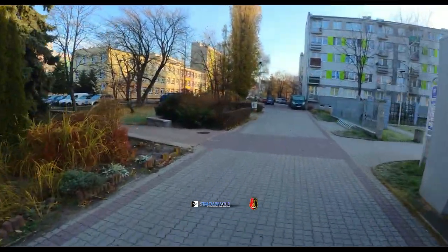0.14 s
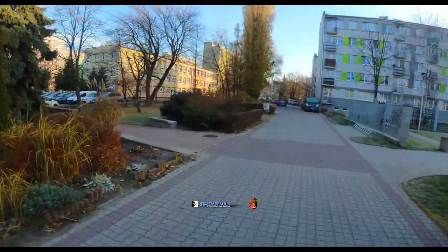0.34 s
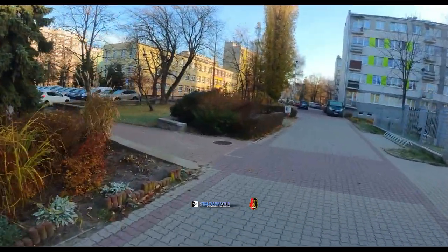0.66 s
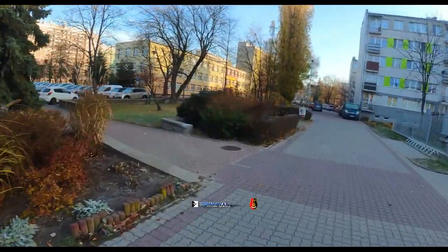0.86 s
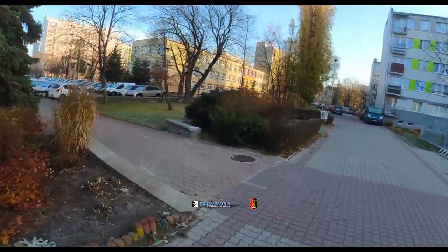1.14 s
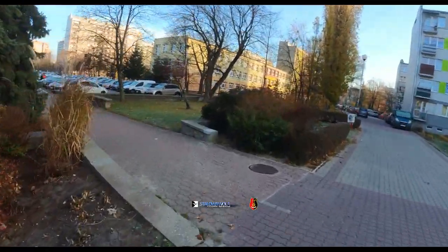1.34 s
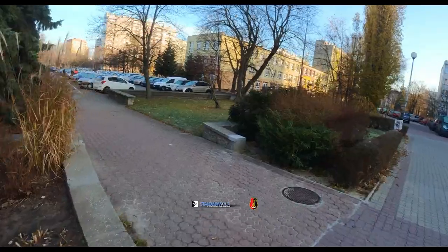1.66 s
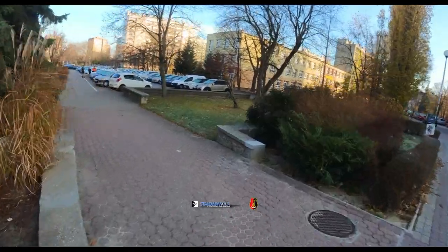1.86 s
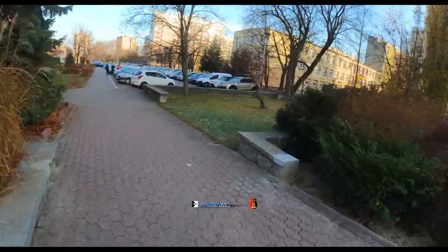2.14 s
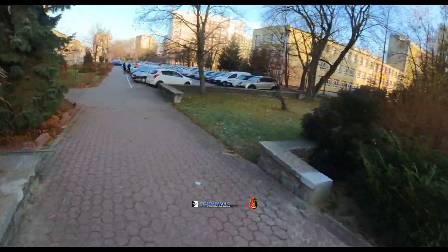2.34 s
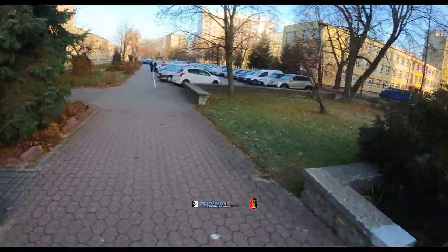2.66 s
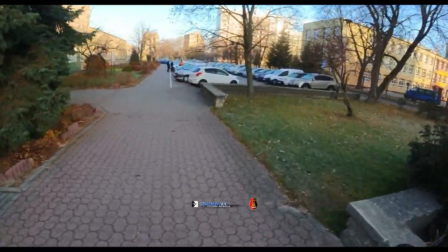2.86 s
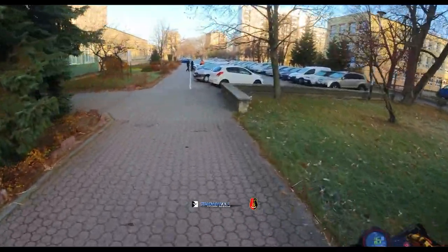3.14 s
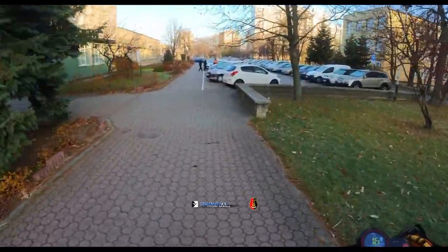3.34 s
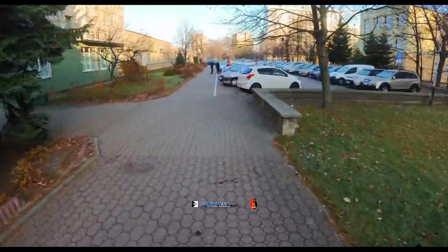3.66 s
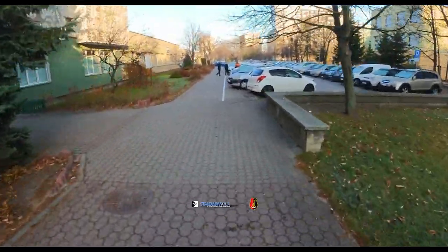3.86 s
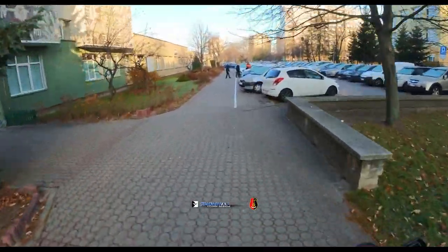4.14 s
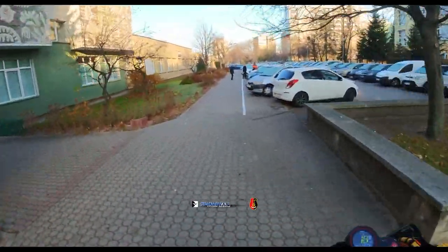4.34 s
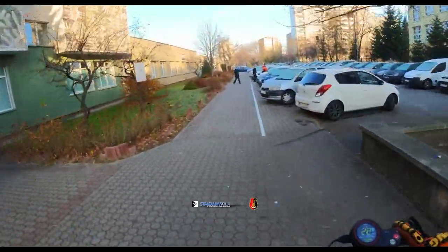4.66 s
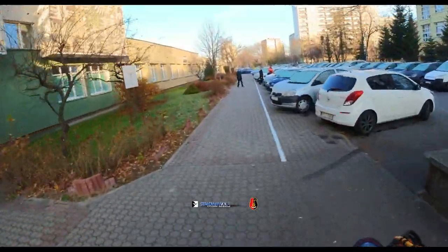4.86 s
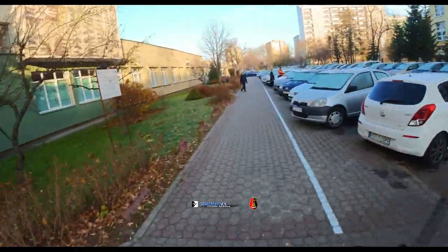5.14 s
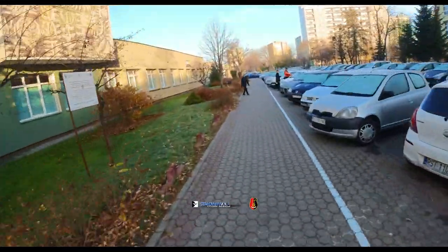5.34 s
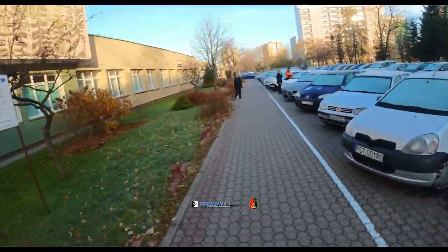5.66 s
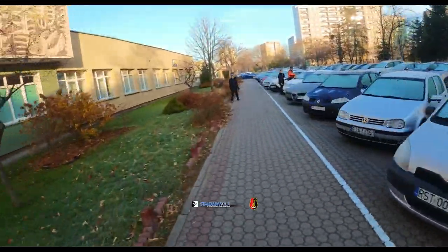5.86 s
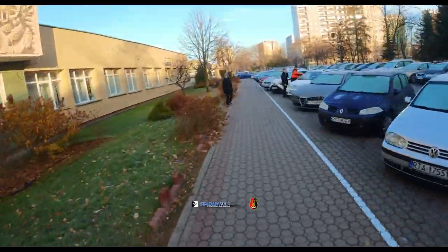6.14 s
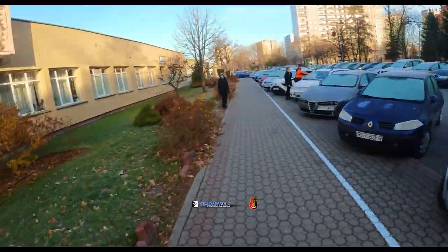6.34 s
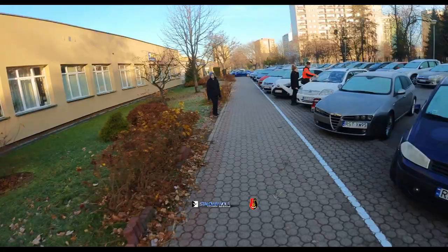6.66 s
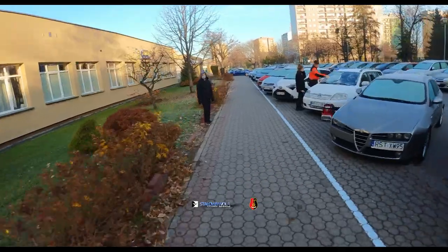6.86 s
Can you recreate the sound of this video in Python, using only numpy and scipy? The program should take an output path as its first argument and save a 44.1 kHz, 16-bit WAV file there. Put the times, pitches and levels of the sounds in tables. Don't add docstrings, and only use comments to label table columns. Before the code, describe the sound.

Muffled onboard sound of a scooter on paving blocks: quiet ticking and tyre buzz, a sharp stone click, a harsh rattling burst, then fast bumpy rolling.

```python
import sys
import numpy as np
from scipy import signal
from scipy.fft import rfft, irfft, next_fast_len
from scipy.io import wavfile
from scipy.ndimage import uniform_filter1d, map_coordinates

SR = 44100
rng = np.random.default_rng(int(sys.argv[2]) if len(sys.argv) > 2 else 0)


def unload_audio(sound):
    columns = np.transpose(np.atleast_2d(sound))
    steps = np.round(np.clip(columns, -1, 1) * 32767)
    wavfile.write(sys.argv[1], SR, steps.astype(np.int16))


def gain_from_db(level_db):
    decades = np.asarray(level_db, float) / 20
    return 10 ** decades


N = 308259

# frequency in Hz, level in dB per Hz.
HISS_TONE = [(300, -29.5), (800, 2), (2000, -3.5), (3200, -10.5), (4000, -15), (5000, -23.5), (7000, -32.5),
             (8200, -27), (9600, -22.5), (10500, -26.5), (12800, -27.5)]
# frequency in Hz, gain in dB.
HOUSING = [(25, -23), (45, -8), (70, 1.5), (2300, -4.5), (2800, -8), (4000, -7), (7000, -29), (13000, -37)]
# time in seconds, level in dB.
AIR = [(0, -59), (.5, -61), (1.4, -69), (2.5, -71.5), (3.35, -60.5), (3.7, -44.5), (4.3, -40.5),
       (4.85, -34), (5.15, -37.5), (5.7, -40), (6.05, -36), (6.55, -38.5), (6.99, -36)]
# peak time in seconds, dB over the air.
PUFFS = [(.04, 7.5), (.27, 1), (.43, 0), (.74, 8), (.95, 10.5), (1.26, 15), (1.99, 12), (2.35, 10),
         (2.67, 5.5), (3.04, 12), (3.52, -4.5), (3.76, -1.5), (3.88, 3), (4.11, 4), (4.3, 4.5), (4.75, 1.5),
         (4.979, 1.5), (5.37, 0), (6.38, 2.5), (6.851, 3.5)]
# frequency in Hz, level in dB per Hz.
RUMBLE_TONE = [(15, -56.5), (25, -35.5), (63, -9), (86, 2), (129, 0), (300, -12.5), (390, -48.5),
               (660, -120)]
# time in seconds, shaking in dB.
ROAD = [(0.0, -46), (0.31, -57), (0.89, -52), (1.52, -58.5), (2.59, -58.5), (3.33, -51), (3.5, -50),
        (3.79, -47), (4.21, -45), (4.36, -36.5), (4.44, -33), (4.76, -41), (5.25, -38.5), (5.57, -40.5),
        (6.07, -42), (6.44, -37.5), (6.66, -41.5), (6.99, -39)]
# frequency in Hz, width in Hz, level in dB.
DECK_MODES = [(285, 77, -5.5), (490.3, 32.8, 2.5), (677.7, 94, -3), (1192, 150, -11.5)]
# frequency in Hz, level in dB per Hz.
ROLLING_TONE = [(88, -35.5), (150, -7), (323, -1.5), (490, -2.5), (729, -3.5), (974, -18.5), (1300, -19),
                (1690, -58), (2860, -120)]
# time in seconds, blocks per second, grip in dB.
TREAD = [(0, 177, -48.5), (.3, 180, -54.5), (1.5, 146, -56.5), (2.2, 120, -63.5), (2.6, 129, -57),
         (3.6, 96, -54.5), (4.2, 145, -53), (4.9, 195, -51), (5.15, 215, -46), (6.0, 256, -48),
         (6.99, 230, -45)]
# frequency in Hz, width in Hz, level in dB.
TYRE_MODES = [(1620, 370, 8), (2020, 180, -7.5)]
# start in seconds, peak in dB, pitch in Hz.
TICKS = [
    (2.0453, -56, 2900),
    (3.4979, -28, 2630),
    (3.4981, -41, 3280),
    (3.498, -59, 7600),
    (3.498, -64, 11500),
    (3.4992, -31, 1400),
    (3.4982, -44, 1900),
    (3.4981, -56, 4440),
    (3.5, -48, 2500),
    (4.5291, -44.5, 3140),
]
# start in seconds, peak in dB, pitch in Hz.
CHIRPS = [
    (0.8138, -54, 3100),
    (0.814, -58, 3700),
    (0.8195, -55, 3280),
    (0.872, -42, 3150),
    (0.8722, -58, 3550),
    (0.884, -56, 3050),
    (3.237, -55, 3170),
]
# start in seconds, peak in dB, pitch in Hz.
SPRAY = [(3.4979, -42, 3200), (4.5266, -59, 10200), (4.5291, -40.5, 3300), (4.54, -43, 3200),
         (4.495, -42, 3200), (3.958, -54, 4000), (3.787, -59, 4400), (5.35, -53, 3800), (5.1726, -59, 9420),
         (5.1861, -49, 3700), (5.3423, -50.5, 10170), (5.9494, -61, 9760)]
# time in seconds, first order in Hz, load in dB.
WHINE = [
    (4.15, 274, -58),
    (4.168, 277, -37),
    (4.21, 287, -33),
    (4.24, 300, -31),
    (4.285, 322, -31),
    (4.305, 338, -37),
    (4.335, 340, -44),
    (4.42, 325, -38),
    (4.5, 322, -50),
]
ORDER_DB = [3, -6, -10]
# time in seconds, pitch in Hz, level in dB.
SINGING = [
    [(4.41, 1125, -55), (4.42, 1115, -33), (4.434, 1105, -34), (4.444, 1105, -50), (4.46, 1105, -31),
     (4.478, 1097, -34), (4.488, 1094, -37), (4.5, 1092, -33), (4.514, 1085, -33), (4.524, 1083, -50)],
    [(6.9, 690, -52), (6.918, 719, -34), (6.94, 760, -38), (6.955, 775, -31), (6.97, 805, -36),
     (7.0, 815, -37)],
]
# start in seconds, peak in dB, pitch in Hz.
FRAME_BUMPS = [(.848, -48, 1136), (1.113, -50, 632), (1.719, -43, 738), (1.721, -49.5, 158),
               (2.053, -41.5, 725), (2.434, -45, 776), (2.546, -45.5, 315), (2.64, -41, 237),
               (2.6479, -42, 1230), (2.689, -38, 630), (2.61, -42, 1550), (2.625, -43, 1490),
               (2.675, -45, 1270), (2.695, -43, 1230), (2.645, -39, 333), (3.085, -46, 1596),
               (3.96, -39, 780), (2.746, -46, 362), (3.01, -51.5, 103.6), (3.188, -41.5, 270),
               (3.07, -43, 263), (3.319, -43, 257), (3.43, -38.5, 662), (3.482, -34, 281),
               (3.562, -45, 285), (3.747, -35, 234.6), (4.02, -33, 261), (4.34, -33, 330),
               (4.405, -27, 604), (4.39, -31, 495), (1.07, -47, 670), (1.27, -48, 650), (1.925, -46, 740),
               (1.715, -48, 590), (6.249, -37, 257), (6.39, -28.5, 205.2), (3.895, -35.5, 249.5),
               (6.962, -34, 560), (6.205, -33, 745)]
# start in seconds, peak in dB.
DECK_BUMPS = [(.025, -40), (.07, -41), (.105, -43), (.455, -46), (.5, -46), (.88, -46), (.975, -48),
              (1.15, -48), (1.2, -48), (1.375, -48), (1.455, -45), (1.765, -46), (1.845, -48), (2.03, -45),
              (.155, -37.5), (.745, -37.5), (.785, -43.5), (1.415, -47.5), (2.78, -39), (0.222, -39),
              (0.331, -46), (0.55, -40), (.609, -47.5), (0.683, -43.5), (1.031, -59), (1.273, -38),
              (1.529, -45), (1.645, -45), (1.934, -39), (1.999, -38), (2.13, -46.5), (2.221, -57),
              (2.646, -41), (2.892, -38.5), (2.995, -50), (3.081, -44), (3.133, -38.5), (3.262, -37),
              (3.408, -42), (3.616, -36.5), (3.963, -41)]
# start in seconds, peak in dB, pitch in Hz.
STRIKES = [(4.4145, -24, 660), (4.4525, -25, 1700), (4.4895, -25, 620), (4.5254, -14.5, 810),
           (4.5256, -21, 1900), (4.5258, -23, 1350), (4.531, -29, 570), (2.0455, -50, 1150),
           (2.0457, -52, 2300), (4.5665, -28, 600), (4.552, -38, 2100), (6.9512, -26, 1720),
           (6.9185, -35, 1630)]
# time in seconds, level in dB.
CLATTER = [
    (4.15, -50.5),
    (4.242, -37.5),
    (4.368, -40),
    (4.45, -38.5),
    (4.562, -34),
    (4.72, -37),
    (4.765, -60),
]
# frequency in Hz, level in dB per Hz.
LOOSE_TONE = [(500, -26.5), (800, 3.5), (1150, -7), (1400, -14.5), (2300, -15), (2700, -27), (3600, -32.5),
              (5000, -61)]
# start in seconds, peak in dB, rattle in Hz, thud in dB over the peak.
RAISED_JOINTS = [(0.0894, -47.5, 1396, 4), (2.0455, -46, 1660, 8), (2.609, -36, 1625, -17),
                 (2.6384, -44.5, 2100, 12.5), (2.665, -47, 1500, 4), (2.693, -43, 1200, -9),
                 (2.715, -52, 1270, -8), (3.08, -38.5, 1684, -15), (3.27, -51, 1570, 8),
                 (3.4802, -42, 1620, 6), (3.49, -37, 1650, -5), (3.636, -49, 1630, 0),
                 (3.692, -43, 1520, -8), (3.7896, -40.5, 1393, 4), (3.955, -39.5, 2060, 4),
                 (4.186, -51, 1100, 10), (4.1989, -50, 1640, 8.5), (4.2272, -45.5, 1580, 12),
                 (4.2567, -42.5, 1790, 8.5), (4.281, -37.5, 1687, 4), (4.3259, -44.5, 1633, 5),
                 (4.339, -40.5, 1510, 7), (4.3784, -38.5, 1555, 10), (4.4155, -22, 1187, 0.5),
                 (4.448, -21, 1634, 0), (4.4856, -22.5, 1800, 0), (4.5242, -29, 1206, 4),
                 (4.563, -27.5, 1870, -4), (4.5985, -36, 1900, 4), (4.6054, -32.5, 1720, 6),
                 (4.6443, -38, 1440, 6), (4.682, -43, 1480, 8), (4.7127, -34, 1603, -4)]
# start in seconds, peak in dB, rattle in Hz.
SLOW_JOINTS = [(0.0889, -44, 1430), (0.1534, -43, 1476), (0.2063, -44.5, 1480), (0.264, -44, 1610),
               (0.324, -47.5, 1510), (0.3687, -49, 1390), (0.3982, -53, 1410), (0.4356, -54, 1510),
               (0.4585, -57, 1560), (0.5074, -50, 1370), (0.5481, -47, 1490), (0.6082, -56, 1620),
               (0.678, -47, 1670), (0.701, -47, 1460), (0.7504, -52, 1530), (0.888, -52, 1640),
               (1.181, -49, 1570), (1.2203, -50, 1530), (1.2986, -54, 1520), (1.337, -49, 1470),
               (1.4957, -51, 1586), (1.56, -52, 1460), (1.6907, -50, 1440), (1.9204, -50, 1550),
               (1.9596, -47, 1270), (2.0449, -50, 1660), (2.2866, -55, 1500), (2.3502, -54, 1220),
               (2.3901, -50, 1580), (2.5694, -60, 1470)]
# time of the jolt in seconds, peak in dB, rattle in Hz.
EVEN_JOINTS = [(4.791, -42, 1540), (4.831, -38.5, 2038), (4.866, -36, 1620), (4.922, -37, 1810),
               (4.9443, -30.5, 1616), (4.9632, -32.5, 1460), (5.0025, -31, 1650), (5.0363, -35, 1527),
               (5.0758, -37, 1584), (5.106, -33.5, 1633), (5.1395, -36, 1560), (5.1716, -29, 1726),
               (5.1893, -26.5, 1650), (5.2297, -36.5, 1406), (5.2737, -41, 1640), (5.2993, -37, 1673),
               (5.3422, -37.5, 1710), (5.3672, -35.5, 1564), (5.4475, -39, 1490), (5.5186, -39.5, 1600),
               (5.529, -37, 1623), (5.5566, -42, 1580), (5.5976, -37, 1550), (5.6359, -37.5, 1643),
               (5.7037, -37, 1610), (5.761, -34.5, 1488), (5.7964, -36, 1654), (5.883, -41, 1733),
               (5.9714, -38.5, 1510), (6.0286, -40.5, 1583), (6.0745, -42, 1786), (6.0899, -34.5, 1630),
               (6.1512, -37, 1650), (6.203, -46, 1485), (6.2225, -42, 1421), (6.2339, -37, 1620),
               (6.2532, -37, 1458), (6.3076, -29.5, 1520), (6.363, -39, 1620), (6.3974, -37, 1590),
               (6.433, -41, 1500), (6.4512, -37, 1567), (6.4923, -39, 1740), (6.547, -37.5, 1686),
               (6.5796, -35, 1580), (6.6036, -35.5, 1726), (6.635, -35, 1640), (6.656, -40, 1651),
               (6.682, -41, 1628), (6.7245, -46, 1550), (6.7418, -43, 1460), (6.7602, -38, 1750),
               (6.7795, -31.5, 1580), (6.8157, -39, 1710), (6.863, -39, 1596), (6.878, -40.5, 1516),
               (4.8955, -41, 1500), (5.055, -36, 1600), (5.122, -36, 1500), (6.976, -35, 1650),
               (6.9185, -34, 1596), (6.9518, -34, 1700)]
# start in seconds, peak in dB, pitch in Hz.
KNOCKS = [(4.599, -27, 667), (4.708, -26, 493), (4.783, -33, 638), (4.807, -30, 483), (4.849, -32, 641),
          (4.895, -29, 460), (4.974, -39, 460), (5.001, -28.5, 650), (5.078, -30, 474), (5.105, -36, 643.4),
          (5.136, -26, 494), (5.245, -29, 499.4), (5.332, -30.5, 490), (5.366, -28.5, 450),
          (5.516, -28, 614), (5.576, -39, 494), (5.629, -32, 601), (5.66, -29.5, 540), (5.703, -29.5, 510),
          (5.748, -33.5, 705), (5.768, -36, 454), (5.815, -33, 470), (5.863, -30.5, 450),
          (5.92, -45, 491.4), (5.96, -39, 503), (6.054, -30.5, 473), (6.14, -32, 507), (6.272, -29, 438),
          (6.311, -29.5, 503), (6.348, -32.5, 689), (6.472, -31, 465), (6.5, -32, 493), (6.543, -30, 470),
          (6.601, -37, 503), (6.711, -35, 630), (6.733, -30, 500), (6.793, -31, 687.5), (6.875, -32, 669.4),
          (6.93, -34, 520), (4.725, -28, 560), (4.855, -32, 490), (5.045, -32, 490), (5.16, -30, 500),
          (5.185, -29, 495), (4.92, -32, 700)]
# start in seconds, peak in dB, pitch in Hz.
PANEL_TAPS = [(4.7818, -46, 1130), (4.8596, -50, 1010), (4.9287, -42, 1217), (5.041, -46, 1140),
              (5.0776, -45, 1096), (5.1494, -47, 1150), (5.196, -44, 1106), (5.2396, -48, 1110),
              (5.273, -49, 1290), (5.4073, -44, 1196), (5.4472, -50, 1135), (5.4867, -48, 1080),
              (5.5297, -41, 1090), (5.5934, -50, 1260), (5.636, -40.5, 1090), (5.7104, -43, 1110),
              (5.761, -44, 1236), (5.9556, -44, 1140), (6.1392, -56, 980), (6.2265, -47, 1260),
              (6.3078, -43, 1120), (6.3457, -49, 1020), (6.5617, -50, 1180), (6.628, -44, 1142),
              (6.7646, -41, 1110), (6.9259, -39, 980)]


def unit(x):
    return x / np.sqrt(np.mean(x ** 2) + 1e-20)


def along(points, hz):
    f, value = np.transpose(points)
    return np.interp(np.log(hz + 1), np.log(f + 1), value)


def curves(rows):
    s, *columns = np.transpose(rows)
    t = np.arange(N) / SR
    return [np.interp(t, s, column) for column in columns]


def gate(rows, fade_s):
    t = np.arange(N) / SR
    nearest_end = np.minimum(t - rows[0][0], rows[-1][0] - t)
    return np.clip(nearest_end / fade_s, 0, 1)


def wobble(rate):
    knots = rng.standard_normal(int(N * rate / SR) + 400)
    return map_coordinates(knots, [np.arange(N) * rate / SR])


def filtered(x, response):
    m = next_fast_len(N + SR // 2)
    hz = np.fft.rfftfreq(m, 1 / SR)
    return irfft(rfft(x, m) * response(hz), m)[:N]


def resonances(modes):
    def response(f):
        total = 0
        for k, (centre, width, db) in enumerate(modes):
            damping = 1j * f * width
            total = total + (-1) ** k * gain_from_db(db) * damping / (centre ** 2 - f ** 2 + damping)
        return total
    return response


def rush(spectrum, patchy_db):
    z = signal.stft(rng.standard_normal(N), nperseg=512)[2]
    patches = uniform_filter1d(rng.standard_normal(z.shape), size=4, axis=0)
    patches = uniform_filter1d(patches, size=8, axis=1)
    noise = signal.istft(z * gain_from_db(patchy_db * unit(patches)), nperseg=512)[1][:N]
    return unit(filtered(noise, lambda hz: gain_from_db(along(spectrum, hz))))


def bursts(rows, rise, t60, width, noisy, hold=0):
    out = np.zeros(N + SR)
    t = np.arange(SR // 14) / SR
    smooth = signal.butter(7, width * 500, fs=SR, output="sos")
    shake = [1, 1j] @ signal.sosfilt(smooth, rng.standard_normal((2, 3 * SR)))
    shake = shake / shake.real.std()
    shape = (1 - np.exp(-t / rise)) ** 2 * gain_from_db(-60 * np.maximum(t - hold, 0) / t60)
    shape = shape / shape.max()
    for s, db, hz in rows:
        at = rng.uniform(400, 2 * SR) + t * SR * hz / 1000
        first, last = int(at[0]), int(at[-1]) + 2
        noise = np.interp(at, np.arange(first, last), shake[first:last])
        tone = np.exp(2j * np.pi * hz * t)
        wave = (tone * (1 - noisy + noisy * noise)).imag
        out[round(s * SR):][:len(t)] += gain_from_db(db) * wave * shape
    return out[:N]


def crossings():
    return np.sort([row[0] for row in RAISED_JOINTS + EVEN_JOINTS + SLOW_JOINTS])


def since_joint(joint_s):
    t = np.arange(N) / SR
    return t - np.append(-1, joint_s)[np.searchsorted(joint_s, t)]


def hiss():
    level_db = -62.5 + 0.44 * wobble(4.08) + 0.66 * wobble(14)
    return gain_from_db(level_db) * rush(HISS_TONE, patchy_db=2.0)


def wind():
    t = np.arange(N) / SR
    puff_s = .04
    puffs_db = sum(db * np.exp(-((t - s) / puff_s) ** 2) for s, db in PUFFS)
    lumps = gain_from_db(1.6 * wobble(14) + 0.26 * wobble(45))
    return gain_from_db(curves(AIR)[0] + puffs_db) * unit(lumps * rush(RUMBLE_TONE, patchy_db=0.0))


def grit():
    ticks = bursts(TICKS, rise=.0004, t60=0.007, width=0.6, noisy=0.45)
    chirps = bursts(CHIRPS, rise=.0008, t60=.014, width=.2, noisy=.2)
    spray = bursts(SPRAY, rise=0.00055, t60=0.07, width=0.52, noisy=0.43)
    return ticks + chirps + gain_from_db(-11.5) * spray


def deck():
    shaking = gain_from_db(2.6 * wobble(25)) * rng.standard_normal(N)
    ringing = unit(filtered(shaking, lambda f: resonances(DECK_MODES)(f) ** 2))
    rolling = rush(ROLLING_TONE, patchy_db=2.5)
    level_db = curves(ROAD)[0] + 1.5 + 0.45 * wobble(9) + 1.7 * wobble(28)
    return gain_from_db(level_db) * unit(0.7 * ringing + 0.8 * rolling)


def tyres(joint_s):
    blocks_per_s, grip_db = curves(TREAD)
    turns = np.cumsum(blocks_per_s * (1 + .03 * wobble(25))) / SR
    slaps = np.diff(np.floor(turns), prepend=0) * gain_from_db(3 * rng.standard_normal(N))
    scrub = (.5 + .5 * np.cos(2 * np.pi * turns)) ** 3 * rng.standard_normal(N)
    pressed = uniform_filter1d(np.exp(-(since_joint(joint_s) / 0.027) ** 2), size=200)
    load = gain_from_db(1.5 * wobble(30) + 5.5 * pressed)
    contact = load * (.5 * unit(slaps) + 0.87 * unit(scrub))
    buzz = filtered(contact, lambda f: resonances(TYRE_MODES)(f) ** 2)
    road_share = 0.42
    level_db = grip_db + road_share * (curves(ROAD)[0] + 46) - 4 + 0.73 * wobble(11.0)
    return gain_from_db(level_db) * unit(buzz)


def motor():
    boom_hz, boom_width_hz, boom_db = 682, 22, 18
    hz, load_db = curves(WHINE)
    phase = 2 * np.pi * np.cumsum(hz * (1 + .018 * wobble(80))) / SR
    groan = np.zeros(N)
    for order, order_db in enumerate(ORDER_DB, start=1):
        swell_db = boom_db / (1 + ((order * hz - boom_hz) / boom_width_hz) ** 2)
        level_db = load_db + order_db + swell_db - .5 + 2.2 * wobble(50)
        groan += gain_from_db(level_db) * np.sin(order * phase)
    return gate(WHINE, .02) * groan


def singing_panel():
    out = np.zeros(N)
    for rows, unsteady in zip(SINGING, (.006, .02)):
        hz, db = curves(rows)
        flutter = gain_from_db(db + 4.5 + 2 * wobble(55))
        phase = 2 * np.pi * np.cumsum(hz * (1 + unsteady * wobble(160))) / SR
        out += gate(rows, 0.0062) * flutter * np.sin(phase)
    return out


def jolts():
    bumps = bursts(FRAME_BUMPS, rise=0.0043, t60=0.066, width=0.76, noisy=0.3)
    deck_rows = [(s, db, 494) for s, db in DECK_BUMPS]
    rings = bursts(deck_rows, rise=.004, t60=.11, width=.15, noisy=.25, hold=.008)
    strikes = bursts(STRIKES, rise=.0006, t60=.022, width=.5, noisy=.25, hold=.0015)
    return bumps + gain_from_db(-3) * rings + strikes


def shaken_parts(joint_s):
    settling_db = np.clip(6 - 450 * since_joint(joint_s), -11, 9)
    settling_db = uniform_filter1d(settling_db, size=150)
    level = gain_from_db(curves(CLATTER)[0] + settling_db)
    return gate(CLATTER, 0.055) * level * rush(LOOSE_TONE, patchy_db=3.0)


def raised_joints():
    s, db, hz, thud_db = np.transpose(RAISED_JOINTS)
    loose_db = db - 7 * (s < CLATTER[0][0])
    clatter_hz = 2000 * gain_from_db(.2 * rng.standard_normal(len(s)))
    thud_hz = 630 * gain_from_db(.6 * rng.standard_normal(len(s)))
    rattle = bursts(zip(s, db - 5.5, hz), rise=0.001, t60=0.071, width=0.5, noisy=0.88, hold=0.0036)
    crack = bursts(zip(s, loose_db - 11.5, np.full_like(s, 1680)),
                   rise=.0011, t60=0.034, width=.95, noisy=1, hold=.014)
    clatter = bursts(zip(s, loose_db - 12, clatter_hz),
                     rise=0.0014, t60=0.076, width=0.41, noisy=0.77, hold=.005)
    thud = bursts(zip(s, db + thud_db - 7.5, thud_hz), rise=0.0035, t60=0.09, width=0.45, noisy=0.89)
    return rattle + crack + clatter + thud


def even_joints():
    s, db, hz = np.transpose(EVEN_JOINTS)
    edge_s = s - .008
    rough_end_s, settle_s = 4.754, 0.36
    clatter_db = db - 16 + 11 * np.exp((rough_end_s - s) / settle_s)
    buzz = bursts(zip(edge_s, db, hz), rise=.003, t60=0.055, width=.32, noisy=0.67, hold=.014)
    slow = bursts(SLOW_JOINTS, rise=.0012, t60=0.036, width=.35, noisy=0.54, hold=0.0025)
    clatter = bursts(zip(edge_s, clatter_db, np.full_like(s, 2020)),
                     rise=0.0046, t60=0.037, width=0.26, noisy=0.83, hold=0.012)
    knocks = bursts(KNOCKS, rise=0.0024, t60=0.057, width=0.26, noisy=0.35, hold=.01)
    taps = bursts(PANEL_TAPS, rise=.003, t60=.07, width=.2, noisy=.6, hold=.01)
    return gain_from_db(-4.5) * buzz + gain_from_db(-2) * slow + clatter + gain_from_db(-2.5) * knocks + gain_from_db(-0.4) * taps


def scene():
    joint_s = crossings()
    ride = wind() + deck() + tyres(joint_s) + motor() + singing_panel()
    ride += jolts() + shaken_parts(joint_s) + raised_joints() + even_joints()
    muffled = filtered(ride, lambda hz: gain_from_db(along(HOUSING, hz)))
    return (muffled + grit() + hiss())[None]


def roll_off(x):
    return signal.sosfilt(signal.butter(12, 12780, fs=SR, output="sos"), x)


def record(dry):
    return roll_off(dry)


dry = scene()
out = record(dry)
unload_audio(out)
```